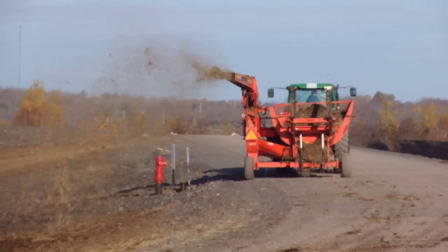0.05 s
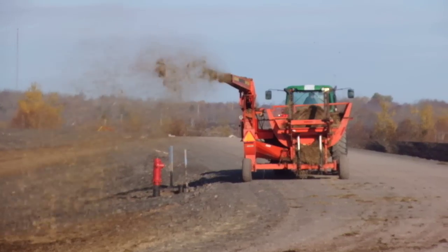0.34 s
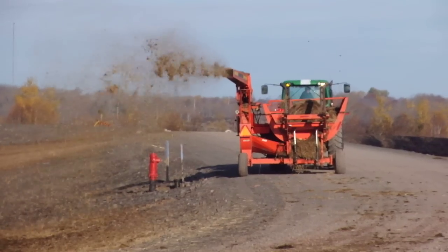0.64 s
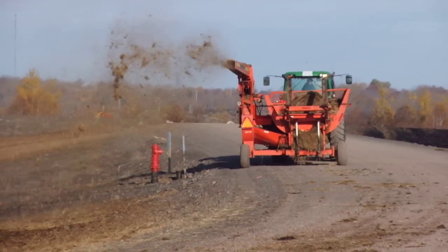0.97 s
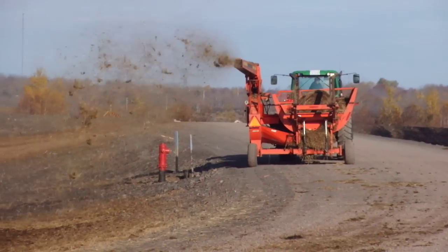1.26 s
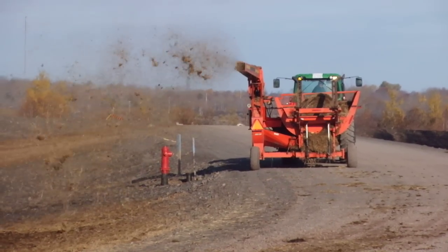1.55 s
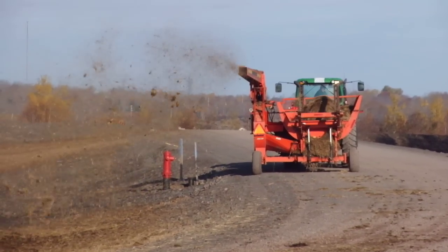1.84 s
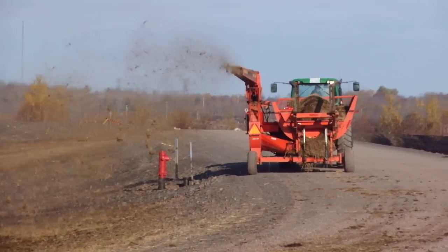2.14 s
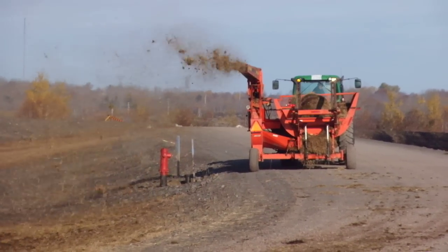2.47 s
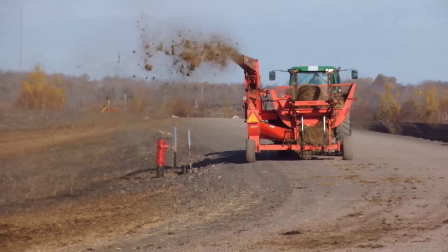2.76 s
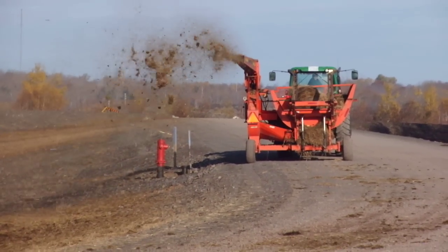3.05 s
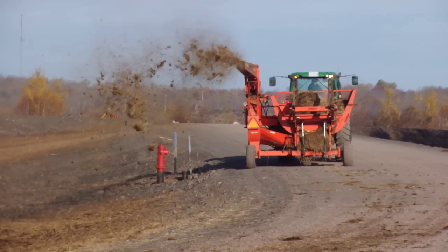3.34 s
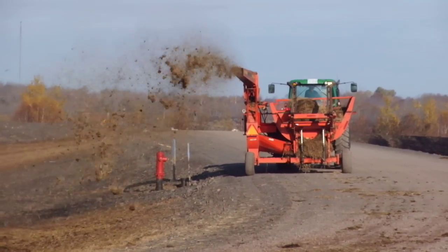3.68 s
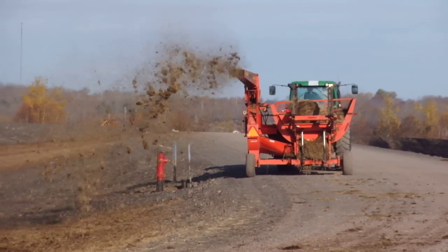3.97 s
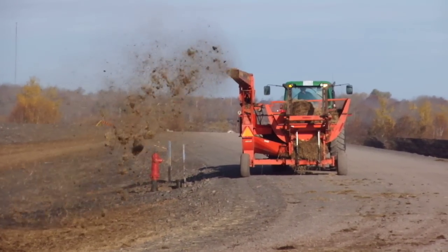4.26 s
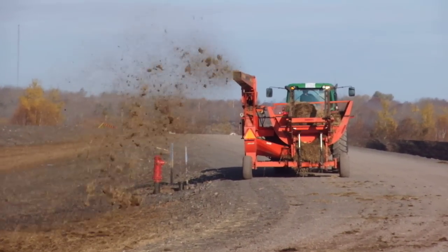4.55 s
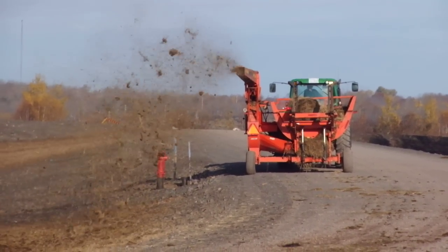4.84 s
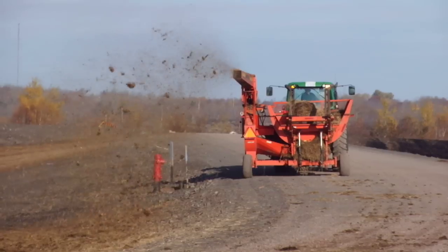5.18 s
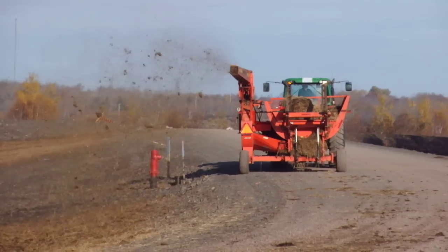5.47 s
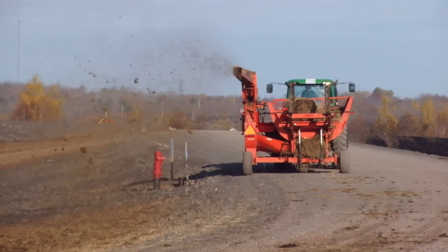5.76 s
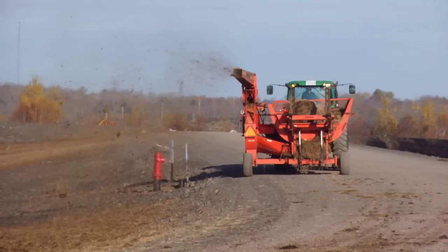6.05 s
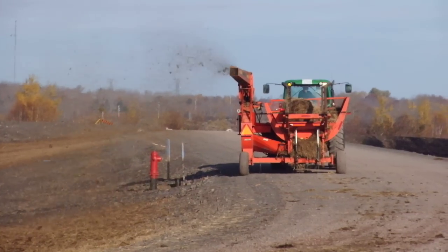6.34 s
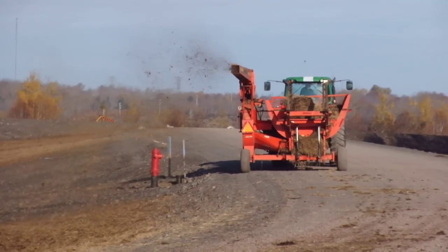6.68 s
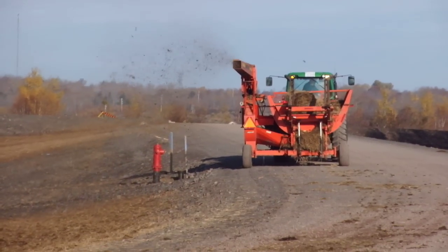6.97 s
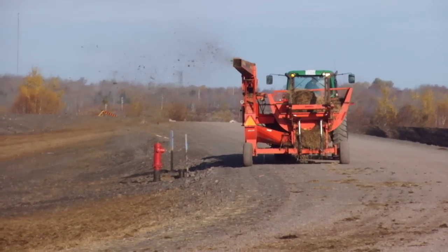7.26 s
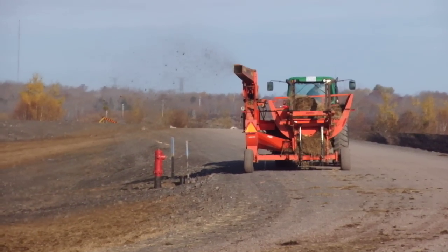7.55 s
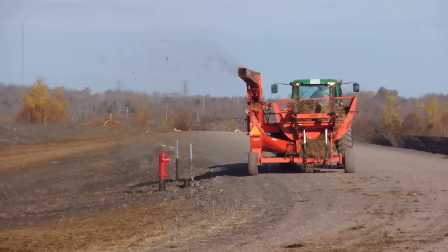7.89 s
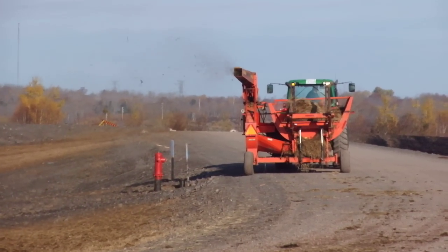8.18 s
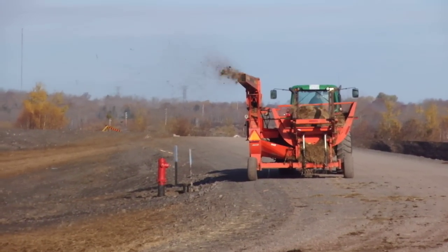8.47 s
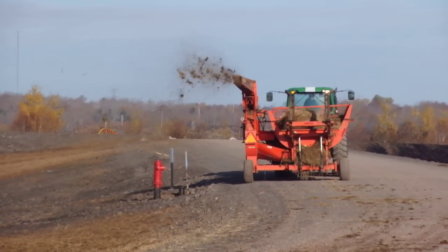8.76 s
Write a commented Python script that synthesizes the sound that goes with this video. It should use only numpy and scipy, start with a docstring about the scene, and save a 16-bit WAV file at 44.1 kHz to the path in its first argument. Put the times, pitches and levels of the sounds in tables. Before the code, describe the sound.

Steady tractor engine hum and rushing fan noise from a straw blower, with gear whine, light rattles and swells of chopping.

```python
"""Outdoors, some way from a six-cylinder tractor driving a straw blower.
Periodic firing makes the exhaust drone, over the broadband rush of the fan and the whine of meshing
gears. When straw feeds in, the load slows the engine and the chopper rasps. Wads knock through the
chute, loose metal rattles and squeaks at its resonances, and a few sharp ticks sound."""
import sys
import numpy as np
from scipy import signal
from scipy.fft import rfft, irfft, next_fast_len
from scipy.io import wavfile

SR = 44100
rng = np.random.default_rng(int(sys.argv[2]) if len(sys.argv) > 2 else 0)


def dump_mix(stems):
    """Bounce the given channels to the path in sys.argv[1] as a 16-bit WAV at rate SR."""
    frames = np.atleast_2d(stems).T  # one column per channel
    limited = np.clip(frames, -1, 1)  # hard clip at full scale
    pcm = np.round(limited * 32767).astype(np.int16)
    wavfile.write(sys.argv[1], SR, pcm)


N = 393372
T = np.arange(N) / SR
CYLINDERS, GEAR_TEETH = 6, 21

# Firing rate of the engine: t/s, f/Hz
FIRING_RATE = [(0, 102.69), (0.5, 103.09), (1.45, 104.23), (2.0, 104.19), (2.25, 102.61), (2.55, 101.74),
               (2.85, 102.15), (3.2, 101.44), (4.15, 103.96), (5.1, 104.08), (6.0, 103.9), (8.0, 103.96),
               (8.25, 102.96), (8.6, 102.9), (8.92, 101.87)]
def load():
    """Governor droop: speed falls as load rises, from 0 running free to 1 in thick straw."""
    free_hz, laden_hz = 104.1, 101.8
    return np.clip((free_hz - curve(FIRING_RATE)) / (free_hz - laden_hz), 0, 1)


# Slow swell of the firing tone: t/s, level/dB
FIRING_LEVEL = [(0, -12.5), (.35, -11.4), (.55, -13), (.8, -11.3), (1.3, -12.5), (2.55, -13), (2.8, -12.5),
                (4.35, -11.7), (4.6, -12.5), (8.05, -13), (8.45, -12.5), (8.92, -13)]
# Weaker exhaust lines: order of the cycle rate, free-running level/dB, change at full load/dB
EXHAUST_ORDERS = [(2, -45.5, 4), (4, -42.5, -2), (5, -46, 3.5), (7, -46.5, 3), (8, -47, 1.5), (9, -51, 4.5),
                  (10, -45, 7), (18, -37, -1), (24, -41, -2.5), (30, -53.5, 14.5), (36, -54.5, 5),
                  (41, -47.5, -1.5), (48, -56.5, -5), (54, -57, -1), (60, -58, -2)]
# Spectrum of the rumble: f/Hz, relative level/dB
RUMBLE_SPECTRUM = [(8, -21.5), (22, -7), (35, -0.5), (50, -0.5), (70, 1), (135, 1), (185, -3.5), (250, -7),
                   (340, -13), (500, -26)]
def exhaust(cycle):
    """Periodic firing gives a harmonic series over a rumble; unequal cylinders add lines in between."""
    strain = load()
    firing_db = curve(FIRING_LEVEL) + (0.16 + 0.47 * strain) * wander(12)
    lagged_load = delayed(strain, seconds=0.096)
    octave_fade = 1 - np.exp(-(lagged_load / 0.39) ** 2)
    octave_db = -18.5 - 8 * octave_fade + (0.28 + 2.2 * strain) * wander(3.6)
    phase = 2 * np.pi * CYLINDERS * cycle
    drone = np.sqrt(2) * (amp(firing_db) * np.cos(phase) + amp(octave_db) * np.cos(2 * phase))
    rumble = amp(-28.5 + 3 * strain) * colour(rng.standard_normal(N), RUMBLE_SPECTRUM)
    return drone + harmonics(cycle, EXHAUST_ORDERS, flutter=0.029, drift_rad=0.13) + rumble


# Rasp of straw passing through the chopper: t/s, level/dB
FEED_LEVEL = [(0, -40.0), (0.4, -38.5), (0.85, -39.5), (1.2, -41), (2.1, -40.5), (2.45, -35.9),
              (2.95, -36.0), (3.5, -35), (3.75, -36.5), (4.6, -39.5), (5.7, -40.9), (7.9, -40.8),
              (8.6, -39.5), (8.92, -33.5)]
# Spectra of the chopper drum, the fan and the chute: f/Hz, relative level/dB
DRUM_SPECTRUM = [(270, -13.5), (340, -7.5), (430, 1.5), (530, 3.5), (630, 3), (710, -3), (790, -12.5)]
FAN_SPECTRUM = [(600, -16), (780, -3), (1000, -2.5), (1250, -3.5), (1620, 0.5), (2000, -3.5), (2480, -5.5),
                (2680, -21), (3000, -22)]
CHUTE_SPECTRUM = [(2400, -13), (2800, -7), (3200, 0), (3600, 1.5), (3950, -1.5), (4400, -1), (5000, -6),
                  (5950, -11.5), (6650, -24), (7300, -18.5), (8100, -23.5), (9900, -30), (10800, -37),
                  (12500, -41)]
def blower(cycle):
    """Modulated flow noise: three bands swell with the feed; fan and chute throb with the shaft."""
    strain, rasp_db = load(), curve(FEED_LEVEL)
    straw_db = rasp_db + 40.5  # rise above the nearly empty chopper
    throb = np.cos(2 * np.pi * cycle)
    tufts = wander(11) * (1 + strain)  # thick straw arrives more unevenly
    drum = rng.standard_normal(N) + 0.062 * clatter(cycle)
    fan = rng.standard_normal(N) + 0.45 * clatter(cycle) + 0.6 * stalks(2500, spread_db=-2.5)
    chute = rng.standard_normal(N) + 0.29 * clatter(cycle) + 0.94 * stalks(4000, spread_db=1.5)
    drum_db = -38 + 0.93 * straw_db + 0.3 * tufts
    fan_db = rasp_db + 0.29 * tufts + 0.47 * throb
    linger_db = 1.5 * delayed(strain, seconds=1.3)  # hiss persists while the last chaff clears
    chute_db = -51 + linger_db + 0.85 * straw_db + 2.1 * strain + 0.5 * tufts + 0.93 * throb
    return (amp(drum_db) * colour(drum, DRUM_SPECTRUM)
            + amp(fan_db) * colour(fan, FAN_SPECTRUM)
            + amp(chute_db) * colour(chute, CHUTE_SPECTRUM))


def stalks(per_s, spread_db):
    """Shot noise: chopped stalks strike at random instants with unequal strength."""
    size = amp(spread_db * np.minimum(rng.exponential(1, N), 4))
    return unit(rng.standard_normal(N) * size * (rng.random(N) < per_s / SR))


def clatter(cycle):
    """Periodic noise: valves and injectors repeat one pattern of clicks every engine cycle."""
    pattern = rng.standard_normal(2048)
    return unit(np.interp(cycle % 1 * len(pattern), np.arange(len(pattern)), pattern))


# Gear tones: order of the mesh rate, free-running level/dB, change at full load/dB
GEAR_ORDERS = [(1, -53, -5.5), (2, -47.5, 6), (3, -62, 16), (4, -54, -5), (5, -59.5, 0), (6, -59, 11),
               (7, -67, 11.5), (9, -61.5, -2), (10, -64.5, 8.5), (13, -79.5, -3.5)]
def gear_whine(cycle):
    """Meshing teeth radiate harmonics of the shaft rate times the number of teeth."""
    return harmonics(GEAR_TEETH * cycle, GEAR_ORDERS, flutter=0.27, drift_rad=0.35)


# Wads thumping the drum: t/s, peak level/dB
THUMPS = [(0.369, -30), (3.03, -27.5), (7.855, -26.5)]
# Wads scraping up the chute: t/s, scrape level/dB, chaff spray level/dB, length/s
SCRAPES = [(0.995, -34.5, -48, 0.028), (2.525, -34, -53, 0.014), (3.08, -28.5, -40.5, 0.038),
           (3.272, -32, -47, 0.037), (3.53, -32.5, -42, 0.023), (8.158, -45, -42, .022),
           (8.48, -27, -42, 0.022)]
def wads():
    """Impact and friction: wads excite broad resonances of drum and chute, and chaff sprays out."""
    out = np.zeros(N)
    for start, db in THUMPS:
        add(out, start, amp(db) * burst(hz=590, width_hz=270, length_s=0.023))
    for start, scrape_db, spray_db, length_s in SCRAPES:
        add(out, start, amp(scrape_db) * burst(hz=1690, width_hz=650, length_s=length_s))
        add(out, start, amp(spray_db) * burst(hz=4150, width_hz=1540, length_s=length_s))
    return out


# Hard knocks of the loose guard, and squeaks of dry metal: t/s, peak level/dB
CLANKS = [(1.888, -41), (2.625, -35), (2.795, -43), (3.485, -40.5), (7.367, -48), (7.599, -44),
          (7.712, -46), (7.937, -48), (7.978, -43.5), (8.085, -43), (8.135, -43), (8.722, -40),
          (8.825, -34.5)]
SQUEAKS = [(3.008, -65), (3.045, -65), (3.24, -65), (3.28, -64), (8.76, -73)]
def loose_metal():
    """Resonance bandwidth: a wide band is heard as a clank, a narrow one as a pitched squeak."""
    out = np.zeros(N)
    for start, db in CLANKS:
        add(out, start, amp(db) * burst(hz=3640, width_hz=480, length_s=0.014))
    for start, db in SQUEAKS:
        add(out, start, amp(db) * burst(hz=8700, width_hz=45, length_s=0.036))
    return out


# Dry, close ticks: t/s, level/dB
TICKS = [(0.0633, -39.5), (0.147, -49), (0.2295, -39.5), (0.313, -49), (0.3966, -39), (0.48, -52),
         (0.563, -39.5), (0.6462, -47), (0.98, -39.5), (1.0216, -43.5), (1.105, -51), (1.3134, -42.5),
         (1.3548, -45.5), (1.4371, -41.5), (2.3127, -45), (2.3545, -44.5), (2.3964, -40), (2.48, -45),
         (2.6469, -39.5)]
# Spectrum of a tick: f/Hz, relative level/dB
TICK_SPECTRUM = [(1100, -12), (1900, 7), (3400, 5.5), (5500, -1.5), (7300, -8), (8200, -27.5),
                 (10500, -26.5), (11800, -34), (13500, -22.5), (14700, -32)]
def ticks(grit, decay_s):
    """An impulse has a broad spectrum: each tick is one snap with an exponentially decaying noise tail."""
    out, t = np.zeros(N), (np.arange(1024) - 256) / SR
    for start, db in TICKS:
        tail = grit * rng.standard_normal(len(t)) * (t > 0) * np.exp(-abs(t) / decay_s)
        snap = (t == 0) + tail
        add(out, start + t[0] + 0.0012, amp(db) * colour(snap, TICK_SPECTRUM))
    return out


def rattle(cycle, level_db, spread_db, ring_hz, scatter, width_hz, length_s):
    """Forced vibration: a loose part strikes once per shaft turn, varying in timing, force and spot."""
    out = np.zeros(N)
    turns = T[1:][np.diff(np.floor(cycle)) > 0]
    for start, (late, force, spot) in zip(turns, rng.standard_normal((len(turns), 3))):
        ring = burst(ring_hz * (1 + scatter * spot), width_hz, length_s)
        add(out, start + 0.0037 * late, amp(level_db + spread_db * min(force, 1)) * ring)
    return out


def harmonics(cycle, table, flutter, drift_rad):
    """Tones locked to a shaft; propagation through moving air modulates their amplitude and phase."""
    out, strain = np.zeros(N), load()
    for order, db, change_db in table:
        phase = 2 * np.pi * (round(order) * cycle + rng.random()) + drift_rad * wander(6.9)
        gain = amp(db + change_db * strain) * (1 + flutter * wander(5.7))
        out += gain * np.sqrt(2) * np.cos(phase)
    return out


def burst(hz, width_hz, length_s):
    """A noise-excited resonance whose envelope peaks at half of length_s, then decays."""
    t = T[:8192]
    f = np.fft.rfftfreq(len(t), 1 / SR)
    ring = irfft(rfft(rng.standard_normal(len(t))) / (1 + ((f - hz) / width_hz) ** 2) ** 2)
    age = 2 * t / length_s
    return unit(ring) * age * np.exp(1 - age)


def colour(x, points):
    """Spectral shaping to rms 1; the gain falls 24 dB per octave beyond the table's ends."""
    hz, db = np.transpose(points)
    size = next_fast_len(len(x))
    octave, known = np.log2(np.fft.rfftfreq(size, 1 / SR) + 1), np.log2(hz)
    outside = abs(octave - np.clip(octave, known[0], known[-1]))
    gain = amp(np.interp(octave, known, db) - 24 * outside)
    return unit(irfft(rfft(x, size) * gain, size)[:len(x)])


def wander(hz):
    """Random fluctuation of rms 1, low-passed at hz."""
    f = np.fft.rfftfreq(4096, T[-1] / 4096)
    slow = irfft(rfft(rng.standard_normal(4096)) / (1 + (f / hz) ** 4))
    return np.interp(T, np.linspace(0, T[-1], len(slow)), unit(slow))


def amp(db):
    """Level in decibels as an amplitude ratio."""
    return 10 ** (np.asarray(db) / 20)


def unit(x):
    """Normalisation to rms 1."""
    return x / np.sqrt(np.mean(x ** 2) + 1e-20)


def curve(rows):
    """Linear interpolation of a timed table at every sample."""
    return np.interp(T, *np.transpose(rows))


def delayed(x, seconds):
    """A pure time delay."""
    return np.interp(T - seconds, T, x)


def add(mix, start, sound):
    """Superposition of a sound from its start time."""
    part = mix[max(round(start * SR), 0):][:len(sound)]
    part += sound[:len(part)]


def scene():
    """The sources superpose; tones and rattles are synchronous with the engine."""
    cycle = np.cumsum(curve(FIRING_RATE)) / SR / CYLINDERS  # four-stroke cycles, one shaft turn each
    machine = exhaust(cycle) + blower(cycle) + gear_whine(cycle)
    transients = wads() + loose_metal() + ticks(grit=0.12, decay_s=0.0019)
    guard = rattle(cycle, level_db=-53, spread_db=4,
                   ring_hz=3560, scatter=0.03, width_hz=620, length_s=0.02)
    chain = rattle(cycle, level_db=-78, spread_db=11,
                   ring_hz=8800, scatter=0.05, width_hz=600, length_s=0.0076)
    return (machine + transients + guard + chain)[None]


def record(dry):
    """Band limiting: a low-pass at 15.7 kHz, with 4 ms fades at the ends."""
    fade = np.clip(np.minimum(T, T[-1] - T) / 0.004, 0, 1)
    lowpass = signal.firwin(511, 15700, window=("kaiser", 9), fs=SR)
    return signal.oaconvolve(dry * fade, lowpass[None], "same")


dry = scene()
out = record(dry)
dump_mix(out)
```